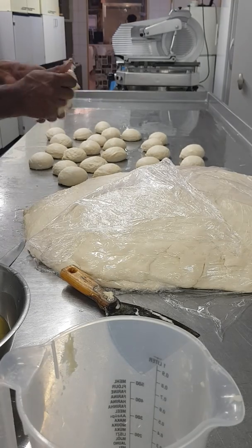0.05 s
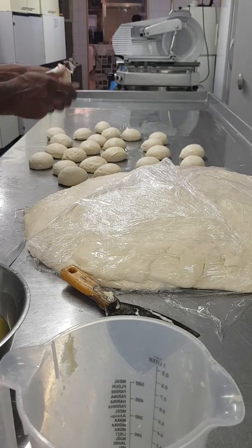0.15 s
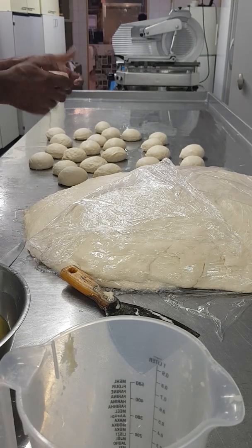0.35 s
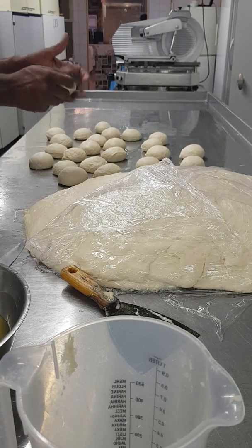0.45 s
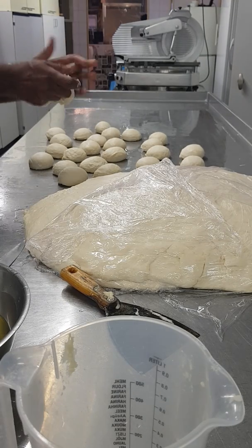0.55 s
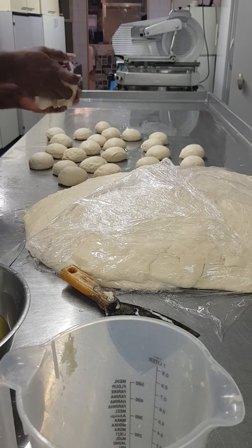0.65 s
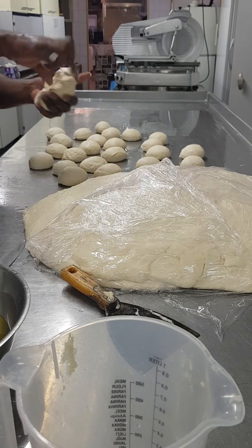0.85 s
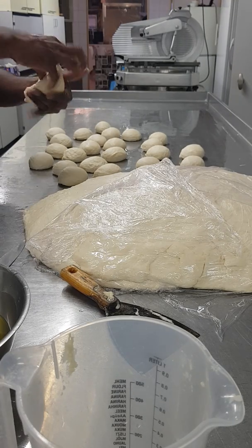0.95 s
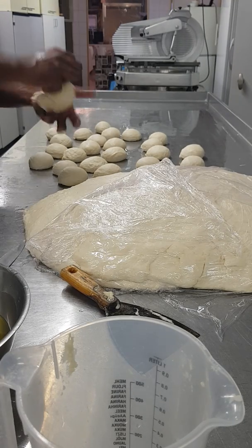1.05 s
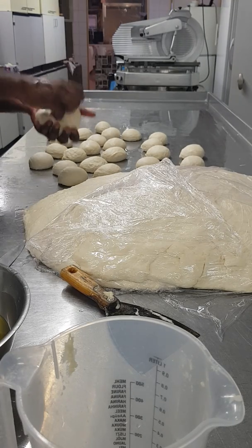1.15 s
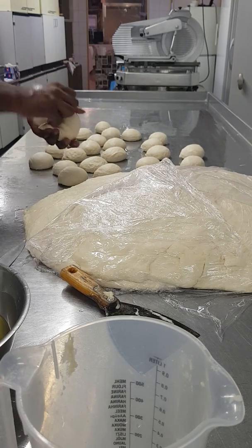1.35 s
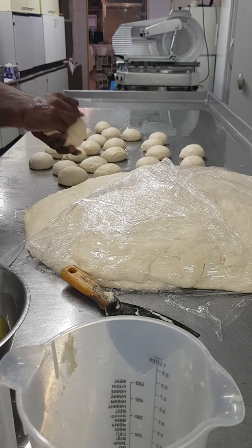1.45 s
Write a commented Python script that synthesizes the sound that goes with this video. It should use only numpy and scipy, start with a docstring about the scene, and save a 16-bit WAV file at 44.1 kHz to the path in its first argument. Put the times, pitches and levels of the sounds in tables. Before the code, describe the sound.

A lump of dough hits a steel worktable with one wet smack and a short, low boom. A light hand pat and faint rubbing follow close by, over a steady refrigerator hum and fan in a slightly echoing kitchen.

```python
"""Dough slapped on a steel table

A lump of dough lands on a steel worktable in a tiled kitchen with a wet smack, and the sheet top booms.
The hands then pat the next lump and rub it; faint squeaks follow the pat, and a dull rustle swells last.
Refrigeration hums and a fan runs throughout."""
import sys
import numpy as np
from scipy import signal
from scipy.fft import rfft, irfft
from scipy.io import wavfile
from scipy.ndimage import uniform_filter1d

SR = 44100
rng = np.random.default_rng(int(sys.argv[2]) if len(sys.argv) > 2 else 0)


def unload_audio(sound):
    """Save the sound as a 16-bit wav file, at the path given as the first command line argument."""
    columns = np.transpose(np.atleast_2d(sound))
    # keep every value between -1 and 1, then stretch to whole-number steps
    steps = np.round(np.clip(columns, -1, 1) * 32767)
    wavfile.write(sys.argv[1], SR, steps.astype(np.int16))


N = 66150
SLAP_S, PAT_S = .2215, .658  # when the dough lands and when the palm pats

# tone colour of the wet smack (frequency [Hz], relative level [dB])
SMACK_COLOUR = [(200, -17.5), (330, -20.5), (450, -20.5), (700, -23.5), (1100, -23), (1600, -27.5),
                (2000, -28), (3300, -32), (4300, -35.5), (5500, -42.5), (7500, -44.5), (11000, -42.5),
                (13000, -50), (15500, -59.5)]
# the table top's own notes; the lowest swell late, as the dough's weight settles
# (frequency [Hz], level [dB], time to fade by 60 dB [s], delay [s], rise time [s])
TABLE_NOTES = [(70.4, -20.5, .42, .029, .04), (97.6, -17.2, .27, .036, .04),
               (117.7, -12.6, .44, .0297, .008), (155, -14.9, .35, .0057, .016),
               (177.6, -7.4, .27, .003, .011), (191, -11.4, .23, .003, .034), (226, -7.1, .29, 0, .006),
               (251.7, -2.1, .25, .005, .036), (278, -22.5, .7, .0066, .04), (305, -24, .3, .002, .01),
               (372, -22, .3, 0, .006), (431, -23, .3, .002, .02), (465, -25, .18, 0, .01),
               (627, -23, .28, .008, .03)]
# tone colour of the pat (frequency [Hz], relative level [dB])
PAT_COLOUR = [(300, -17), (650, -11), (900, -3), (1250, -16), (1800, -14), (2500, -3), (3200, -.5),
              (3950, 0), (4700, -13), (6500, -20), (11600, -19.5), (15500, -35)]
# thump in the dough and knock in the cupped palm (frequency [Hz], level [dB], time to fade by 60 dB [s])
PAT_NOTES = [(103.8, -44.5, 0.19), (883, -49, 0.067)]
# strokes of the palm over the dough (middle time [s], half length [s], level [dB])
RUB_STROKES = [(0, 0.038, -66), (0.703, 0.064, -66), (1.171, 0.11, -60.5), (1.52, 0.1, -68.5)]
# tone colour of the rubbing (frequency [Hz], relative level [dB])
RUB_COLOUR = [(800, -12), (1800, -4), (3500, 4), (5500, 1), (8000, 0), (10500, 0.5), (13000, -5),
              (15500, -12)]
# faint squeaks (time [s], length [s], frequency [Hz], width [Hz], level [dB])
SQUEAK_NOTES = [(.948, .045, 1400, 110, -63), (.95, .045, 1220, 110, -66), (1.128, .015, 1790, 110, -63)]
# tone colour of the rustle (frequency [Hz], relative level [dB])
RUSTLE_COLOUR = [(40, -4), (120, -6), (260, 7), (400, -14.5), (900, -17.5), (1500, -23), (3000, -30),
                 (8000, -50)]
# mains hum and motor whine (frequency [Hz], level [dB], left minus right [dB])
HUM_TONES = [(99.6, -50.5, -1), (200, -48.3, -1), (349, -69, 0), (641, -73, 0), (1728, -82, 0),
             (1776, -80, 0), (3426, -84, 0), (4016, -83, 0)]
# tone colour of the fan's rushing air (frequency [Hz], relative level [dB])
AIR_COLOUR = [(25, -18), (50, -12.5), (70, -6.5), (130, -3.5), (220, -0.5), (350, -11.5), (550, -15),
              (900, -19.5), (1400, -29), (3000, -30.5), (5000, -34.5), (7000, -44), (11000, -43),
              (15500, -49)]
# where the fan's duct and casing ring (frequency [Hz], width [Hz], level [dB])
FAN_PEAKS = [(96, 11, -53), (255.7, 50, -51), (625, 98, -65), (1780, 310, -76), (2615, 160, -76.5),
             (3994, 140, -76)]
# how long the kitchen echoes (frequency [Hz], time to fade by 60 dB [s])
ROOM_ECHO = [(60, 1), (250, 0.62), (500, 0.39), (1100, 0.43), (3000, .41), (7500, .32), (15000, 0.25)]
# how far hands and dough sound to one side (frequency [Hz], left minus right [dB])
HANDS_PAN = [(100, 0), (250, -2), (600, 3), (1300, 1.5), (2400, 0), (4400, 1), (8000, 6.5), (15000, 3)]
# how alike the left and right noise are (frequency [Hz], likeness [0 to 1])
STEREO_LIKENESS = [(100, 0.99), (250, 0.72), (500, 0.48), (1000, 0), (15000, 0)]


def smack(level_db=-14.5, hold_s=.032, wet_db=2, wet_s=.048):
    """Dough spreads on the steel: a crack and a wet burst that the sheet and tiled walls carry on."""
    colour = gain(curve(SMACK_COLOUR, freqs()))
    sticky_crackle = gain(wet_db * wobble(per_second=500) * np.exp(-since(SLAP_S) / wet_s))
    near = sticky_crackle * room_decay(noise(colour), SLAP_S + hold_s)
    dull_colour = colour / np.hypot(1, freqs() / 6000)  # the far end of the kitchen rings on, dull
    far = gain(-16) * noise(dull_colour) * fade(SLAP_S, fade_s=.77)
    pop_s = SLAP_S + .0024  # trapped air bursts out just after first contact
    crack = gain(-3) * noise(colour) * rise(pop_s, .0019) * np.exp(-since(pop_s) / .0041)
    whole = gain(level_db) * (rise(SLAP_S, .0031) * (near + far) + crack)
    return cut_bass(whole, hz=318)  # below this the table's own notes take over


def table_boom(right_delay_s=.00025):
    """The soft, heavy blow sets the sheet top booming; the right side hears it a little later."""
    sides = [sum(ring(hz, db, fade_s, arrival + delay, rise_s)
                 for hz, db, fade_s, delay, rise_s in TABLE_NOTES)
             for arrival in (SLAP_S, SLAP_S + right_delay_s)]
    return np.array(sides) * pan(db=-1.6)


def pat(crack_db=-45, crack_s=.022, echo_db=-51):
    """A palm claps lightly on dough: a short crack, a soft knock and the room's echo."""
    colour = gain(curve(PAT_COLOUR, freqs()))
    crack = gain(crack_db) * noise(colour) * np.exp(-since(PAT_S) / crack_s)
    knock = sum(ring(hz, db, fade_s, PAT_S, rise_s=.002) for hz, db, fade_s in PAT_NOTES)
    echo = gain(echo_db) * room_decay(noise(colour), PAT_S)
    return knock + rise(PAT_S, .001) * (crack + echo)


def rubs(grain_db=.9):
    """Skin slides over dough with a soft, slightly uneven hiss."""
    strokes = sum(gain(db) * swell(middle, half) for middle, half, db in RUB_STROKES)
    grain = gain(grain_db * wobble(per_second=89))
    return strokes * grain * noise(gain(curve(RUB_COLOUR, freqs())))


def squeaks(fade_s=.16):
    """Narrow bands of noise sound as brief squeaks that fade in the room."""
    return sum(gain(db) * noise(peak(hz, width)) * rise(start, .008) * fade(start + length, fade_s)
               for start, length, hz, width, db in SQUEAK_NOTES)


def rustle(level_db=-44):
    """A soft, dull rustle swells as the hands move again."""
    colour = gain(curve(RUSTLE_COLOUR, freqs()))
    return gain(level_db) * swell(middle_s=1.512, half_s=.068) * noise(colour)


def fan(air_db=-51):
    """Air rushes through the fan and makes its duct and casing ring."""
    air = gain(air_db) * noise(gain(curve(AIR_COLOUR, freqs())))
    return air + sum(gain(db) * noise(peak(hz, width)) for hz, width, db in FAN_PEAKS)


def fridge_hum(waver_db=-2.2):
    """The refrigeration gives off mains hum and motor whine; each tone wavers in level."""
    hum = 0
    for hz, db, pan_db in HUM_TONES:
        tone = np.sqrt(2) * np.sin(2 * np.pi * (hz * since(0) + rng.random()))
        hum = hum + tone * gain(db + waver_db * wobble(per_second=9.35)) * pan(pan_db)
    return hum


def room_decay(sound, start):
    """Each band of a sound dies away at the pace of the kitchen's echo."""
    spectrum, out = rfft(sound), 0
    for band_hz, fade_s in ROOM_ECHO:
        share = curve([(hz, hz == band_hz) for hz, _ in ROOM_ECHO], freqs())
        out = out + irfft(spectrum * share, N) * fade(start, fade_s)
    return out


def ring(hz, db, fade_s, start, rise_s):
    """One note of a struck object swings up and dies away."""
    return gain(db) * rise(start, rise_s) * fade(start, fade_s) * np.sin(2 * np.pi * hz * since(start))


def noise(colour):
    """Stereo noise of strength 1 with this tone colour; the bass is alike on both sides."""
    alike = curve(STEREO_LIKENESS, freqs())
    shared, opposite = rfft(rng.standard_normal((2, N))) * np.sqrt([1 + alike, 1 - alike])
    spectrum = np.array([shared + opposite, shared - opposite]) * colour
    return irfft(spectrum, N) / np.sqrt(2 * np.mean(colour ** 2))


def peak(hz, width_hz):
    """A tone colour with one steep-sided peak."""
    return 1 / (1 + ((freqs() - hz) / width_hz * 2) ** 4) ** .75


def wobble(per_second):
    """Random steps, smoothed twice, that wander roughly between -1 and 1."""
    hold = int(SR / per_second)
    steps = np.repeat(rng.standard_normal(N // hold + 1), hold)
    return 1.1 * uniform_filter1d(uniform_filter1d(steps, hold), hold)[:N]


def rise(start, rise_s):
    """A smooth climb from silence to full level."""
    return np.sin(np.pi / 2 * np.minimum(since(start) / rise_s, 1)) ** 2


def fade(start, fade_s):
    """Full level until the start, then 60 dB quieter every fade_s seconds."""
    return np.exp(-np.log(1000) * since(start) / fade_s)


def swell(middle_s, half_s):
    """A bell-shaped rise and fall in level."""
    return np.exp(-((since(0) - middle_s) / half_s) ** 2)


def cut_bass(sound, hz):
    """Weaken everything below this frequency."""
    return signal.sosfilt(signal.butter(2, hz, "high", fs=SR, output="sos"), sound)


def pan(db):
    """Left and right gains; positive decibels lean left."""
    return gain(np.array([[1], [-1]]) * db / 2)


def gain(db):
    """Turn decibels into a multiplier."""
    return 10 ** (np.asarray(db) / 20)


def curve(points, hz):
    """Read between (frequency, value) points, with octaves evenly spaced."""
    point_hz, values = np.array(points, float).T
    return np.interp(np.log(np.maximum(hz, 1)), np.log(point_hz), values)


def freqs():
    """The frequency of each slot in the spectrum."""
    return np.arange(N // 2 + 1) * SR / N


def since(start):
    """Seconds since a moment, zero before it."""
    return np.maximum(np.arange(N) / SR - start, 0)


def scene():
    """Hands and dough mostly a little left, the boom slightly right, machines all round."""
    hands = smack() + pat() + rubs()
    placed_hands = irfft(rfft(hands) * pan(curve(HANDS_PAN, freqs())), N)
    return placed_hands + table_boom() + squeaks() + rustle() + fan() + fridge_hum()


def record(dry, top_hz=15700):
    """The microphone thins the deepest bass, rounds the loudest peaks and cuts the highest treble."""
    thin = cut_bass(dry, hz=30)
    rounded = thin / (1 + thin ** 8) ** (1 / 8)
    return signal.sosfilt(signal.ellip(10, .2, 80, top_hz, fs=SR, output="sos"), rounded)


dry = scene()
out = record(dry)
unload_audio(out)
```